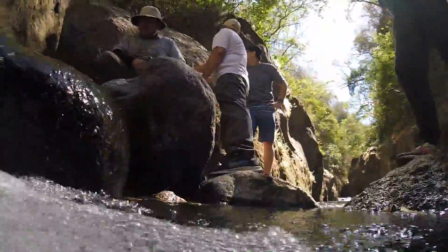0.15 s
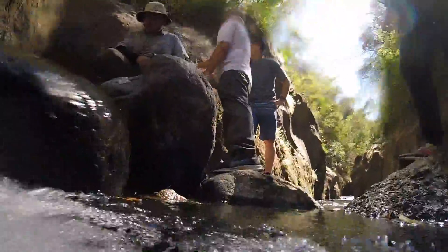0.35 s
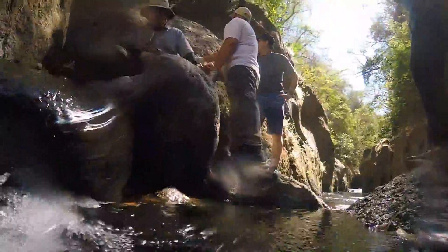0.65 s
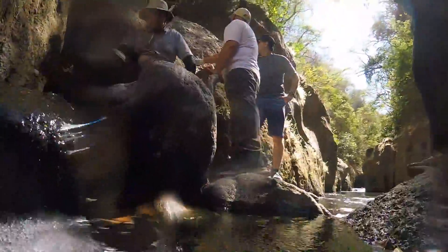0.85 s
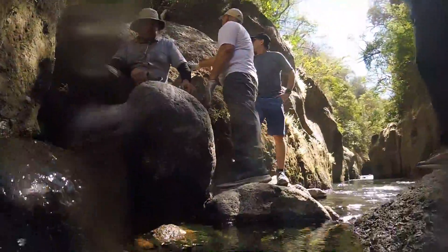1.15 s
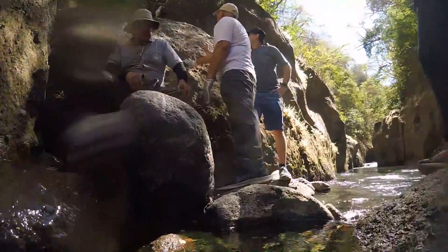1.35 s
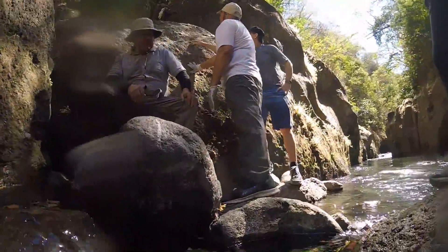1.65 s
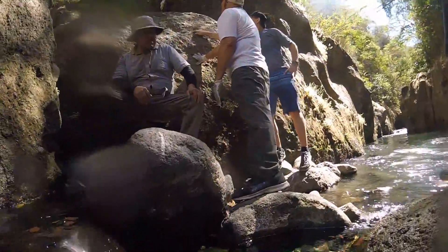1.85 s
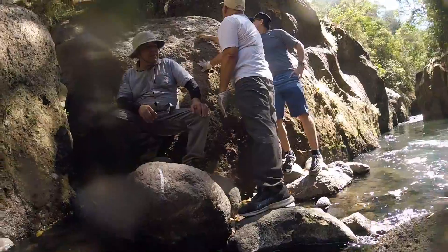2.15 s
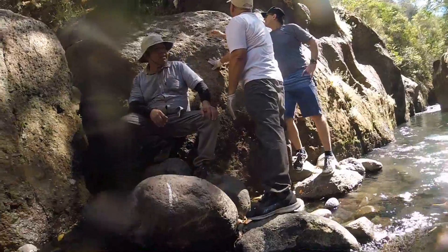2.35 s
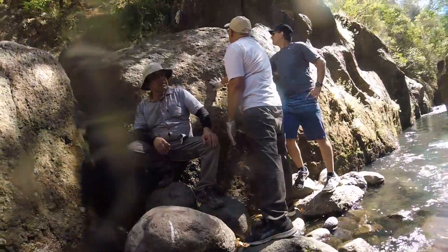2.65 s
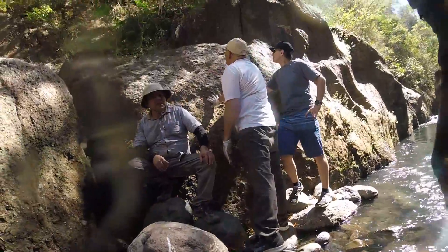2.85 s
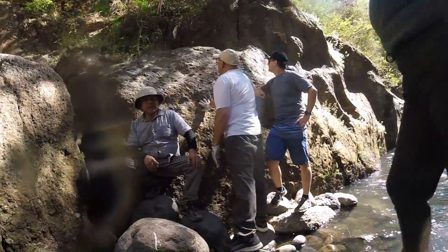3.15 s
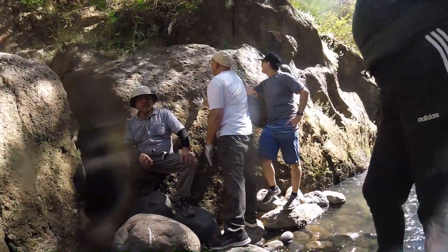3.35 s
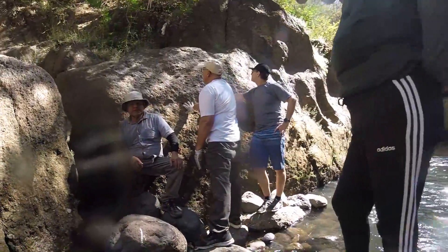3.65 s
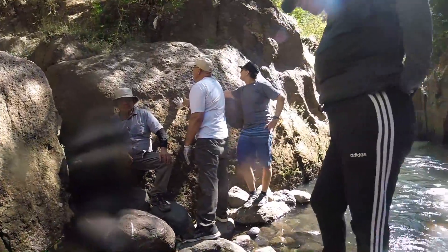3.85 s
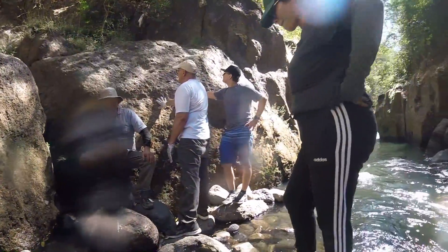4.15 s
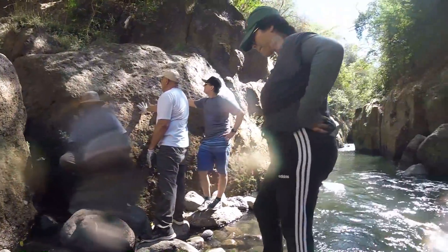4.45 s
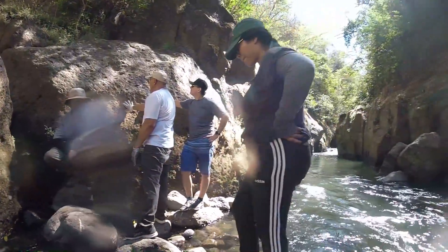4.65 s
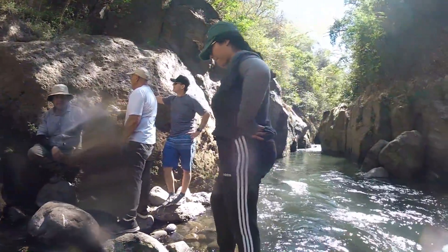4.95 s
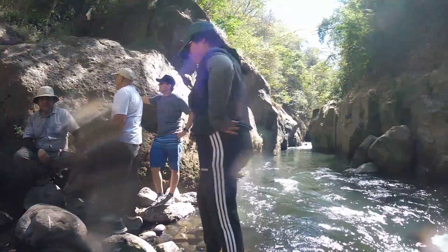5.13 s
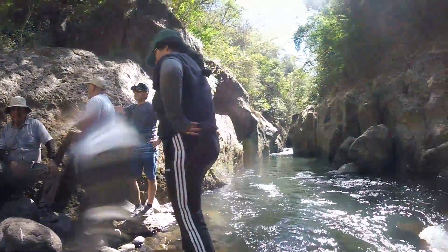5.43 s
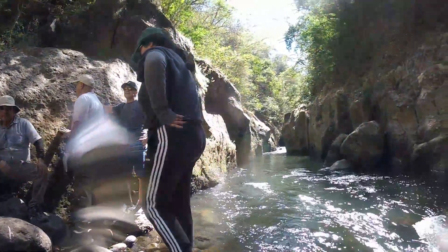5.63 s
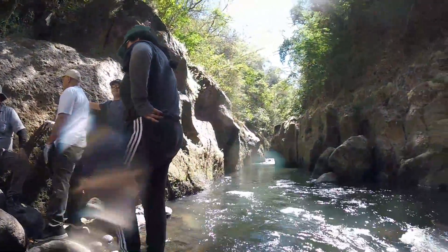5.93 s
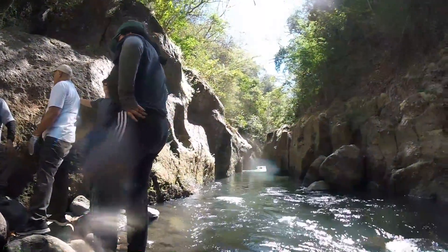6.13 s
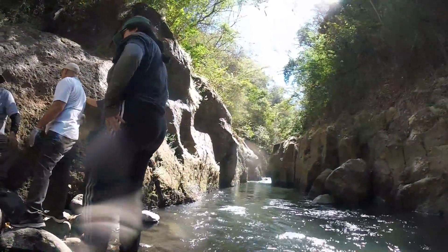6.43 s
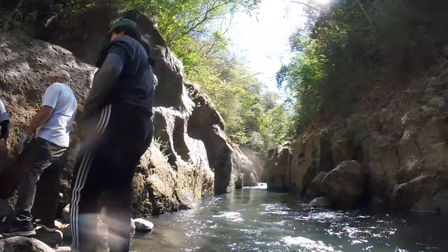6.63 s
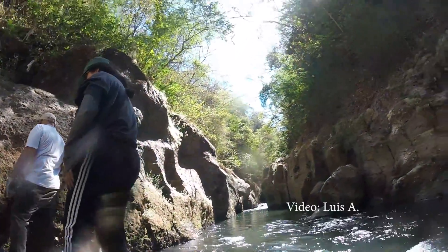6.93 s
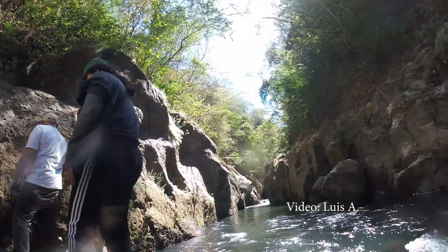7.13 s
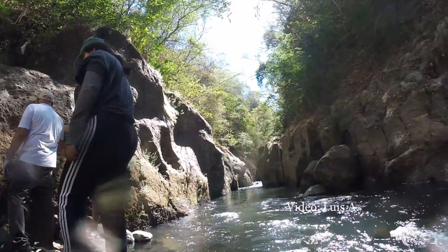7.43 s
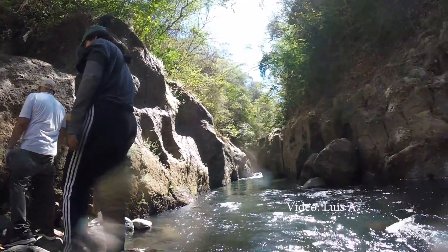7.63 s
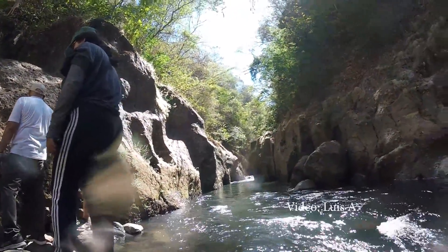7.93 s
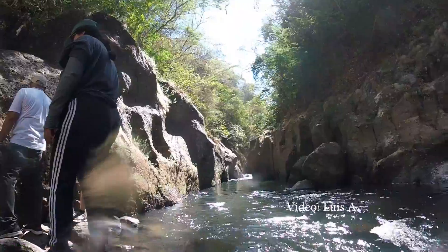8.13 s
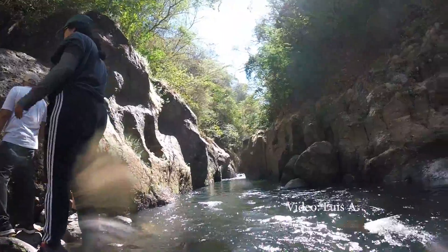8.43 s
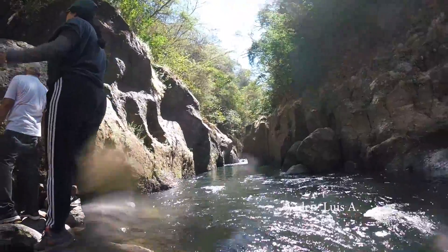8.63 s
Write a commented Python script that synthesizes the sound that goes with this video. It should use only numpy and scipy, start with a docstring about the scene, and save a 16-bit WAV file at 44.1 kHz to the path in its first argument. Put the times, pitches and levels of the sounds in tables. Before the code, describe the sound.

Muffled river rapids gurgle and bubble through a water-plugged microphone over deep wobbling rumble, then suddenly open into bright hissing flow.

```python
"""A river pool in a rocky gorge, heard at the one microphone of a waterproof camera just lifted out.
At first water plugs the port: dull rapids (noise coloured by air pockets), gurgling bubbles (climbing sines),
short crackles (noise bursts), and the deep rumble of the wet membrane, which goes on throughout.
Near four seconds the port clears: hiss and near spray ring its resonances.
Past six seconds the camera swings round to the rapids and the treble changes colour."""
import sys
import numpy as np
from scipy import signal
from scipy.io import wavfile
from scipy.ndimage import uniform_filter1d

SR = 44100
rng = np.random.default_rng(int(sys.argv[2]) if len(sys.argv) > 2 else 0)


def convert_level_to_amplitude(level_db):
    """Map a level in decibels to its linear amplitude factor."""
    exponent = np.asarray(level_db, float) / 20
    return 10 ** exponent


def int16_out(signal):
    """Quantize to a 16-bit WAV file."""
    q = np.round(np.clip(np.atleast_2d(signal).T, -1, 1) * 32767)
    wavfile.write(sys.argv[1], SR, q.astype(np.int16))


N = 387192


def rms_one(x):
    """Scales to unit rms."""
    return x / np.sqrt(np.mean(x ** 2) + 1e-20)


def in_time(rows, t):
    """Second column of a table, read at times t between its rows."""
    s, value = np.transpose(rows)
    return np.interp(t, s, value)


def at_hz(points, hz):
    """A spectrum in dB read at hz along log pitch, as a column."""
    at, db = np.transpose(points)
    return np.interp(np.log(hz), np.log(at), db)[:, None]


def bump(hz, centre, spread):
    """A bell of height 1 in log pitch, one row per hz."""
    return np.exp(-(np.log(hz[:, None] / centre) / spread) ** 2)


def drift(rate):
    """Slow chance: noise at every 40th sample through a double one-pole; spread 1."""
    r = np.exp(-80 * np.pi * rate / SR)
    slow = signal.lfilter([1], [1, -2 * r, r * r], rng.standard_normal(N // 40 + 2002))[2000:]
    return np.interp(np.arange(N) / 40, np.arange(len(slow)), rms_one(slow))


def patches(hz, t, bins, frames):
    """Random patches over pitch and time, smoothed along both; spread 1."""
    noise = rng.standard_normal((len(hz), len(t)))
    return rms_one(uniform_filter1d(uniform_filter1d(noise, size=bins, axis=0), size=frames, axis=1))


def band(x, low_hz, high_hz):
    """Band-pass to unit rms."""
    return rms_one(signal.sosfilt(signal.butter(2, [low_hz, high_hz], "band", fs=SR, output="sos"), x))


def coloured(x, shape_db, level_db):
    """Filters x moment by moment; shape_db(hz, t) sets the colour, level_db(t) the rms of unit noise."""
    hz, t, spec = signal.stft(x, SR, nperseg=1024, noverlap=768)
    gain = convert_level_to_amplitude(shape_db(hz + 1, t))
    gain = gain / np.sqrt(np.mean(gain ** 2, axis=0)) * convert_level_to_amplitude(level_db(t))
    return signal.istft(spec * gain, SR, nperseg=1024, noverlap=768)[1][:N]


def add(out, s, grain):
    """Mixes a grain in at second s."""
    i = round(s * SR)
    out[i:i + len(grain)] += grain[:N - i]


def bubble(hz, t60, rise):
    """A bubble swells, rings down by 60 dB in t60 seconds, and climbs in pitch as it nears the surface."""
    swell_cycles = 1.56
    t = np.arange(round(1.2 * t60 * SR)) / SR
    swell = np.sin(np.pi / 2 * np.minimum(t * hz / swell_cycles, 1)) ** 2
    decay = convert_level_to_amplitude(-60 * np.maximum(t - swell_cycles / hz, 0) / t60)
    return swell * decay * np.sin(2 * np.pi * hz * (t + rise * t * t / t60))


def churn(flicker_db, rate, grains_per_s, grain_db):
    """Broad water noise: a flickering wash plus sudden grains that clump; rms 1."""
    wash = rng.standard_normal(N) * convert_level_to_amplitude(flicker_db * (drift(rate) + 0.045 * drift(11.0)))
    born = rng.random(N) < grains_per_s * convert_level_to_amplitude(3.0 * drift(8.0)) / SR
    sizes = convert_level_to_amplitude(grain_db + 3.0 * np.minimum(rng.exponential(1, N), 2.5))
    # each grain is a puff of noise with a decay constant of 4.6 ms
    puff = signal.lfilter([1], [1, -np.exp(-1 / (0.0046 * SR))], born * sizes)
    return rms_one(wash + puff * rng.standard_normal(N))


# how far the microphone port has drained: (time [s], clear [0-1])
PORT_DRAINING = [(0, 0.06), (.4, 0.01), (.9, 0.04), (1.7, 0.23), (3.0, 0.24), (3.93, 0.19), (3.97, 0.52),
                 (4.1, 0.76), (4.3, 0.8), (4.45, 0.87), (5, 0.89), (8.78, 0.95)]


def clearness(t):
    """The port passes from plugged (0) to clear (1) as the water drains."""
    return in_time(PORT_DRAINING, t)


# loose water on the housing: (time [s], wet [0-1])
HOUSING_WATER = [(0, 1), (.5, 0.58), (1.2, 0.71), (2, 0.23), (3.4, 0), (4, 0.1), (4.5, 0.4), (5.6, 0.16),
                 (8.78, 0.12)]


def wetness(t):
    """Loose water lifts the low rush and brings more small bubbles to the port."""
    return in_time(HOUSING_WATER, t)


# loudness of the rapids at the camera: (time [s], level [dB])
RAPIDS_LEVEL = [(0, -25.5), (.35, -29.5), (.42, -30), (1.7, -28.5), (1.95, -30.5), (3.75, -32.5),
                (4.0, -35.5), (4.3, -34), (4.34, -31), (4.5, -31.5), (5.7, -31.5), (5.85, -30.5),
                (6.5, -31), (6.8, -30.5), (8.25, -29.5), (8.75, -33.5)]


def rapids_level(t):
    """The rapids rise and fall at the camera, in dB."""
    return in_time(RAPIDS_LEVEL, t)


# air pockets behind the film, each gliding as it drains:
# (start [s], end [s], first pitch [Hz], last pitch [Hz], lift [dB])
AIR_POCKETS = [(-.1, 0.223, 1880, 1880, 5), (-.1, 0.128, 890, 733, 18), (0.064, 0.352, 687, 550, 11),
               (0.164, 0.327, 413, 380, 6), (.36, 0.508, 822, 780, 14), (0.49, 0.646, 1000, 1050, 1.5),
               (.8, 1.946, 525, 535, 3), (0.672, 0.804, 1200, 1250, 1.5), (0.844, 1.356, 1175, 1340, 8.5),
               (1.495, 1.956, 1265, 1330, 4.5), (2.05, 2.354, 1300, 1370, 3), (2.45, 2.85, 1530, 1700, 5),
               (2.7, 3.015, 1370, 1400, 1.5), (2.207, 2.9, 582, 636, 4.5), (2.797, 3.335, 730, 950, 8.5),
               (3.25, 3.7, 790, 1020, 5.5), (3.5, 3.993, 1100, 1210, 5), (4.7, 5.75, 2140, 2260, 3),
               (4.89, 5.897, 1390, 1420, 2), (4.904, 5.91, 330, 360, 3), (6.905, 9, 1430, 1370, 5)]


def pockets(t):
    """Pitch and lift in dB of every air pocket's mode at times t, one row each."""
    fade = 0.22   # share of a pocket's life spent forming, and again closing
    start, end, from_hz, to_hz, lift_db = np.transpose(AIR_POCKETS)[:, :, None]
    age = np.clip((t - start) / (end - start), 0, 1)
    return from_hz * (to_hz / from_hz) ** age, lift_db * np.clip(np.minimum(age, 1 - age) / fade, 0, 1)


# colour of the rapids through the plugged and the clear port: (pitch [Hz], relative density [dB per Hz])
PLUGGED_COLOUR = [(50, -33.5), (90, -23), (140, -5), (262, 0), (316, -5.5), (592, -4), (690, -6.5),
                  (1340, -11.5), (1800, -23.5), (2500, -36.5), (3200, -44.5), (4300, -58.5), (4900, -53.5),
                  (5600, -55), (8000, -82)]
CLEAR_COLOUR = [(50, -1.5), (90, -8), (158, -2), (553, -9.5), (1020, -12.5), (1380, -13.5), (1800, -10),
                (2250, -16), (2750, -28), (3500, -30), (4000, -35), (4500, -42), (6000, -46.5),
                (9000, -90.5)]


def rush_shape(hz, t):
    """Water dulls the rapids until the port clears; pockets and slosh shape their own bands."""
    pocket_spread, slosh_spread = 0.11, .5   # widths in log pitch
    slosh_hz, slosh_dry_db, slosh_wet_db = 235, -5, 5.5
    clear = np.clip(clearness(t), 0, 1)
    lift = sum(db * bump(hz, mode, pocket_spread) for mode, db in zip(*pockets(t)))
    slosh_db = slosh_dry_db + (slosh_wet_db - slosh_dry_db) * wetness(t)
    lift = lift + slosh_db * bump(hz, slosh_hz, slosh_spread)
    colour = (1 - clear) * at_hz(PLUGGED_COLOUR, hz) + clear * at_hz(CLEAR_COLOUR, hz)
    return colour + lift + 1.27 * patches(hz, t, 9, 9)


def rush():
    """The body of the rapids: churned water noise coloured by the draining port."""
    return coloured(churn(0.99, 58.0, 30.0, -4.5), rush_shape, rapids_level)


WHISTLE_LEAD_S = 0.14   # the treble gets through the first gap before the body of the sound does


def whistle_level(t):
    """The port whistle follows the rapids and gains as the port clears."""
    shut_db, open_db = -45, -9.5   # over the rapids, at clear 0 and 1
    return rapids_level(t) + shut_db + (open_db - shut_db) * clearness(t + WHISTLE_LEAD_S)


# port resonance: (pitch [Hz], plugged [dB], clear [dB], clear and turned to the rapids [dB])
PORT_RESONANCE = [(4020, -21, -60, -14.5), (4800, -4.5, -21, -18.5), (5670, -18.5, -3, -9),
                  (6100, -9, -0.5, -9), (6440, -0.5, -1, -8), (7150, -1.5, 0.5, -0.5),
                  (7600, -1.5, -1, -4.5), (8320, -2.5, -1.5, -4), (9100, -3, -9, -11.5),
                  (10200, -4, -15, -17), (10530, -8, -12, -17.5), (12200, -18, -33, -26),
                  (15000, -48, -38, -46)]
# the camera swings round: (start [s], end [s])
CAMERA_TURN = (6.1, 6.6)
# the last drops creep round the port and shift the top of its whistle: (time [s], pitch [Hz])
WHISTLE_CREST = [(3.8, 6700), (4.5, 7094), (5.0, 7650), (5.35, 7800), (5.6, 6940), (5.9, 7460), (6.3, 7060),
                 (6.9, 6600), (7.5, 7150), (8.2, 7250), (8.78, 7200)]


def whistle_shape(hz, t):
    """The port rings differently when plugged, when clear, and when turned to the rapids."""
    crest_db, crest_spread = 2.5, 0.099   # lift, and width in log pitch
    clear = np.clip(3 * clearness(t + WHISTLE_LEAD_S) - .6, 0, 1)
    turned = np.interp(t, CAMERA_TURN, [0, 1])
    at, *states = np.transpose(PORT_RESONANCE)
    plugged, ahead, to_rapids = (np.interp(hz, at, db)[:, None] for db in states)
    crest = crest_db * bump(hz, in_time(WHISTLE_CREST, t), crest_spread)
    opened = (1 - turned) * ahead + turned * to_rapids + crest
    return 1.2 * patches(hz, t, 30, 40) + (1 - clear) * plugged + clear * opened


# second port resonance: (pitch [Hz], relative density [dB per Hz])
VENT_RESONANCE = [(10500, -30), (11300, -8), (12000, -1), (12500, 0), (13300, -3), (15000, -13),
                  (15500, -28), (17000, -70)]
# the second vent dries: (time [s], level [dB])
VENT_DRYING = [(.4, -91.5), (1, -72.5), (1.6, -63), (2.7, -65), (3, -70.5), (3.9, -67), (4.3, -62.5),
               (6.2, -68), (7.1, -66), (8.78, -69)]


def sparkle(hiss):
    """The hiss rings faintly in the second vent as that dries, and flickers."""
    flickering = hiss * convert_level_to_amplitude(1.5 * drift(40.0))
    return coloured(flickering, lambda hz, t: at_hz(VENT_RESONANCE, hz), lambda t: in_time(VENT_DRYING, t))


def far_droplets(hiss):
    """Far off, many tiny bubbles ring at random moments within the hiss."""
    s, pitch, size, cycles = rng.random((2200, 4)).T
    hz = 4500 * 3.2 ** pitch
    level_db = -3.0 - 4.3 * np.log(1 - .97 * size)
    t60 = (24.0 + 20.0 * cycles) / hz
    for k in range(len(s)):
        add(hiss, s[k] * (N / SR - .1), convert_level_to_amplitude(level_db[k]) * bubble(hz[k], t60[k], 0.044))


# droplets snapping close to the microphone: (time [s], level before an 11 dB cut and the port's colour [dB])
NEAR_DROPLETS = [(3.8417, -38), (4.045, -27), (4.1265, -33), (4.3444, -30), (5.3536, -28), (5.759, -28),
                 (5.8265, -28.5), (5.8556, -28.5), (6.2034, -23.5), (6.935, -27), (7.794, -23.5),
                 (7.969, -23), (8.046, -21.5), (8.168, -21.5), (8.2384, -15.5), (8.313, -21.5),
                 (8.676, -29.5)]


def near_spray(hiss):
    """Close droplets snap: a brief ring and a click of noise, levelled against the whistle."""
    t = np.arange(300) / SR
    for s, db in NEAR_DROPLETS:
        gain = convert_level_to_amplitude(db - whistle_level(s) - 11.0)
        hz = 7040 * rng.uniform(0.91, 1.15)
        add(hiss, s, gain * bubble(hz, 0.017, 0.054))
        add(hiss, s, gain * rng.standard_normal(300) * np.exp(-t / .0015))


def treble():
    """Hiss and spray ring the two port resonances."""
    hiss = churn(1.0, 30.0, 90.0, -3.0)
    far_droplets(hiss)
    near_spray(hiss)
    return coloured(hiss, whistle_shape, whistle_level) + sparkle(hiss)


# short crackles and snaps at the port; the one at 0.3747 s is the big pop overloading the microphone:
# (time [s], level before decay [dB], pitch [Hz])
PORT_CRACKLES = [(0.058, -30, 2590), (0.212, -50, 4500), (0.217, -34, 2600), (0.3747, -33.5, 2990),
                 (0.649, -51, 4500), (1.044, -54, 4800), (3.84, -41, 2900), (4.348, -29, 2700)]


def crackle():
    """Crackles are short noises under an octave wide; faint ticks come at random early on."""
    out, t = np.zeros(N), np.arange(600) / SR
    ticks_db, ticks_hz, ticks_end_s = -63, 4800, 3.6   # lowest level, higher of two pitches, last moment
    crackles = list(PORT_CRACKLES)
    for s, size, pitch in rng.random((40, 3)):
        hz = ticks_hz * (.6 if pitch < .35 else 1)
        crackles.append((s * ticks_end_s, ticks_db + 9 * size, hz))
    for s, db, hz in crackles:
        low_hz, high_hz = .78 * hz, 1.25 * hz
        snap = band(band(rng.standard_normal(600), low_hz, high_hz), low_hz, high_hz)
        add(out, s, snap * convert_level_to_amplitude(db) * np.exp(-t / .002))
    return out


# moving air at the microphone: (time [s], level before gusts [dB])
MOVING_AIR = [(0, -17.5), (.4, -31.5), (.9, -26), (2.2, -27), (2.451, -35), (3.9, -57), (4.3, -37),
              (5.9, -33.5), (6.2, -29), (6.45, -30), (6.9, -20.5), (7.4, -27.5), (7.7, -37), (8.15, -22),
              (8.78, -27.5)]


def buffet(t):
    """Moving air buffets the membrane: low noise that comes in gusts."""
    gusts = rng.standard_normal(N) * convert_level_to_amplitude(2.0 * drift(16.0))
    return convert_level_to_amplitude(in_time(MOVING_AIR, t)) * band(gusts, 24.8, 78.6)


# the hand moves the camera: (time [s], level before the travel limit [dB])
HAND_MOVEMENT = [(0.0, -22.5), (1.56, -26), (1.71, -19.5), (3.2, -17.5), (3.25, -12.5), (4.23, -32.5),
                 (5.62, -21), (6.6, -28), (6.84, -17), (7.43, -33), (7.73, -11.5), (8.78, -14.5)]


def heave(t):
    """The hand heaves the wet membrane slowly: noise around ten hertz."""
    return convert_level_to_amplitude(in_time(HAND_MOVEMENT, t)) * band(rng.standard_normal(N), 4.86, 16.7)


# shaking of the water on the membrane: (time [s], level before drift and the travel limit [dB])
WATER_SHAKING = [(0.0, -19), (0.49, -11), (0.71, -20), (2.25, -14), (2.57, -8.5), (4.01, -11.5),
                 (4.23, -23.5), (4.38, -22), (4.91, -25.5), (5.77, -19.5), (6.33, -25), (7.19, -15),
                 (7.48, -25.5), (7.53, -17), (8.61, -17), (8.66, -52), (8.73, -12), (8.78, -15.5)]
# membrane pitch under the shifting water: (time [s], pitch before random drift [Hz])
MEMBRANE_PITCH = [(0, 30.47), (.6, 25.7), (1.4, 33.86), (2.2, 29.96), (2.5, 26.1), (3.9, 26.04),
                  (4.4, 21.23), (6, 21.8), (7.1, 32.92), (7.6, 24.28), (8.78, 24.85)]


def wobble(t):
    """The water-loaded membrane wobbles near its own pitch: an unsteady sine plus low noise."""
    turns = np.cumsum(in_time(MEMBRANE_PITCH, t) * (1 + 0.2282 * drift(6.58))) / SR
    shake = rms_one(np.sin(2 * np.pi * turns) + 0.47 * band(rng.standard_normal(N), 22.0, 37.2))
    return convert_level_to_amplitude(in_time(WATER_SHAKING, t) + 2.0 * drift(2.7)) * shake


# knocks on the housing: (time [s], level before attack and decay [dB], pitch [Hz])
HOUSING_KNOCKS = [(0.043, -4.5, 116), (0.3345, 0.5, 105), (2.738, -6, 120)]


def knocks(t):
    """A knock is a short push on the housing that dies within about two cycles."""
    out, t = np.zeros(N), t[:3000]
    for s, db, hz in HOUSING_KNOCKS:
        shape = np.exp(-t / 0.0053) * np.minimum(t / .003, 1)
        add(out, s, convert_level_to_amplitude(db) * np.sin(2 * np.pi * hz * t) * shape)
    return out


# the big burst throws the membrane out and back once: (start [s], length [s], level [dB])
MEMBRANE_THROW = (.352, .038, -6)


def rumble():
    """The membrane heaves and wobbles within its travel, is thrown once, buffeted and knocked."""
    travel = .72   # the furthest the membrane swings, of full scale
    t = np.arange(N) / SR
    start, length, throw_db = MEMBRANE_THROW
    # the throw overrides the heave and wobble
    swing = (heave(t) + wobble(t)) * (1 - np.exp(-((t - start - length / 4) / length) ** 4))
    out = travel * np.tanh(swing / travel) + buffet(t) + knocks(t)
    add(out, start, convert_level_to_amplitude(throw_db) * np.sin(2 * np.pi * t[t < length] / length))
    return out


def fizz():
    """Small bubbles clump; many take an open pocket's pitch; while plugged, water dulls all the higher ones."""
    out = np.zeros(N)
    share_dry, share_wet, share_lost = .6, 1, .55   # share heard before clumping; part lost once clear
    muffle_hz, muffle_db_per_octave = 1350, 36   # the water plug dulls bubbles above this pitch
    s, lot, pick, pitch, size, cycles = rng.random((1700, 6)).T
    s = s * (N / SR - .1)
    clear, wet = clearness(s), np.clip(wetness(s), 0, 1)
    share = (share_dry + (share_wet - share_dry) * wet) * (1 - share_lost * clear)
    share = share * convert_level_to_amplitude(4.0 * drift(7.0)[(s * SR).astype(int)])
    modes, lifts = pockets(s)
    chosen = np.argmax(lifts * rng.random(lifts.shape), axis=0)
    tuned = np.choose(chosen, modes) * (0.879 + .26 * pitch)
    untuned = 250 * (5.84 + 4 * clear) ** pitch
    hz = np.where((pick < .7) & (lifts.max(axis=0) > 2), tuned, untuned)
    level_db = rapids_level(s) + 1.3 * wet - 3.0 - 2.0 * np.log(1 - .97 * size)
    level_db = level_db - muffle_db_per_octave * (1 - clear) * np.maximum(np.log2(hz / muffle_hz), 0)
    t60 = (14.0 + 32.0 * cycles) / hz
    for k in np.flatnonzero(lot < share):
        add(out, s[k], convert_level_to_amplitude(level_db[k]) * bubble(hz[k], t60[k], .08))
    return out


# bubbles popping at the port: (time [s], level [dB], starting pitch [Hz], 60 dB decay [s])
PORT_BUBBLES = [(0.035, -33, 766, 0.036), (0.058, -26, 378, 0.052), (0.096, -17.5, 475, 0.033),
                (0.097, -28, 890, .015), (0.115, -30, 700, 0.076), (0.212, -17, 330, 0.016),
                (0.249, -13.5, 298, 0.018), (0.191, -16.5, 663, 0.058), (0.229, -15.5, 577, 0.017),
                (0.237, -20, 1030, .02), (0.262, -17, 394, 0.052), (0.278, -14.5, 557, 0.045),
                (0.294, -23, 1300, .03), (0.344, -20, 1235, .02), (0.354, -23, 1150, 0.015),
                (0.352, -16.5, 620, 0.042), (0.361, -14, 993, 0.036), (0.363, -13, 1214, 0.019),
                (0.367, -9.5, 688, 0.045), (0.3719, -30, 840, 0.027), (0.3739, -3, 846, 0.024),
                (0.382, -26, 784, 0.036), (0.42, -23, 905, 0.044), (0.449, -23, 770, 0.043),
                (0.486, -16.5, 1030, 0.017), (0.489, -19, 616, 0.04), (0.686, -19.5, 458, 0.11),
                (0.723, -21, 760, 0.022), (0.73, -19.5, 1215, 0.048), (0.759, -25, 456, 0.051),
                (0.849, -19, 1410, 0.011), (0.901, -19, 1237, 0.097), (0.945, -13.5, 950, 0.015),
                (0.947, -22, 543, 0.017), (0.949, -20.5, 257, 0.081), (0.992, -18, 394, 0.063),
                (1.055, -20.5, 1086, 0.09), (1.136, -24.5, 470, 0.056), (1.223, -26, 1330, 0.039),
                (1.328, -19.5, 1360, 0.042), (1.351, -24, 447, 0.036), (1.376, -28, 480, 0.02),
                (1.39, -23, 830, 0.057), (1.415, -14, 565, 0.0085), (1.479, -15, 308, 0.0084),
                (1.571, -24, 1200, .03), (1.599, -21.5, 1347, 0.068), (1.602, -22, 643, 0.057),
                (1.639, -18, 515, 0.026), (1.641, -19.5, 1120, .02), (1.685, -22, 484, 0.067),
                (1.705, -20, 955, 0.033), (1.755, -12.5, 1115, 0.021), (1.783, -24.5, 1600, 0.038),
                (1.847, -19, 350, 0.027), (1.852, -23, 715, 0.11), (1.909, -31, 525, 0.027),
                (1.909, -19, 1450, 0.018), (2.141, -23.5, 1230, 0.036), (2.185, -23.5, 1320, .03),
                (2.274, -17.5, 633, 0.02), (2.298, -24, 523, .04), (2.369, -22, 586, 0.042),
                (2.415, -14, 585, 0.043), (2.578, -22, 600, 0.036), (2.681, -20.5, 608, 0.12),
                (2.759, -20.5, 616, 0.066), (3.008, -22.5, 810, 0.025), (3.25, -22, 850, 0.033),
                (3.331, -23, 925, 0.037), (3.431, -22, 810, 0.055), (3.509, -23, 915, 0.033),
                (3.749, -22, 930, 0.069), (4.516, -28, 568, 0.049), (5.052, -27, 2070, 0.056),
                (5.09, -26, 744, 0.033), (5.193, -21.5, 1430, .02), (5.222, -25, 1380, .02),
                (5.235, -27, 302, .1), (5.245, -28, 1290, 0.027), (5.531, -25, 1440, 0.049),
                (5.545, -27, 430, 0.03), (5.596, -23, 376, 0.025), (5.629, -18.5, 420, 0.014),
                (5.779, -20.5, 1550, 0.026), (5.832, -23, 700, 0.026), (6.301, -21, 755, 0.026),
                (6.622, -21.5, 1360, 0.026), (6.871, -31, 584, .03), (7.059, -24, 1330, .03),
                (7.119, -23.5, 1390, 0.061), (7.504, -25.5, 650, 0.11), (7.687, -25, 1500, 0.033),
                (8.039, -28, 1580, 0.033), (8.152, -35, 3130, 0.033), (8.491, -24, 487, 0.019)]


def gurgle():
    """Bubbles pop loudly at the port, each with a splash of water closing over it, amid the small fizz."""
    out, t = fizz(), np.arange(2000) / SR
    for s, db, hz, t60 in PORT_BUBBLES:
        add(out, s, convert_level_to_amplitude(db) * bubble(hz, np.clip(t60, .008, .12), 0.059))
        splash = band(band(rng.standard_normal(2000), 456.0, 1330.0), 456.0, 1330.0)
        add(out, s, convert_level_to_amplitude(db - 11.0) * splash * np.exp(-t / .006))
    return out


def scene():
    """All sources meet at the one microphone."""
    return (rush() + treble() + crackle() + rumble() + gurgle())[None]


def band_limit(x):
    """A steep low-pass at the top of the band."""
    return signal.sosfilt(signal.butter(12, 15300, fs=SR, output="sos"), x)


def record(dry):
    """The microphone's input stage clips the highest peaks."""
    mix = np.clip(dry, -.97, .97)
    return band_limit(mix)


dry = scene()
out = record(dry)
int16_out(out)
```